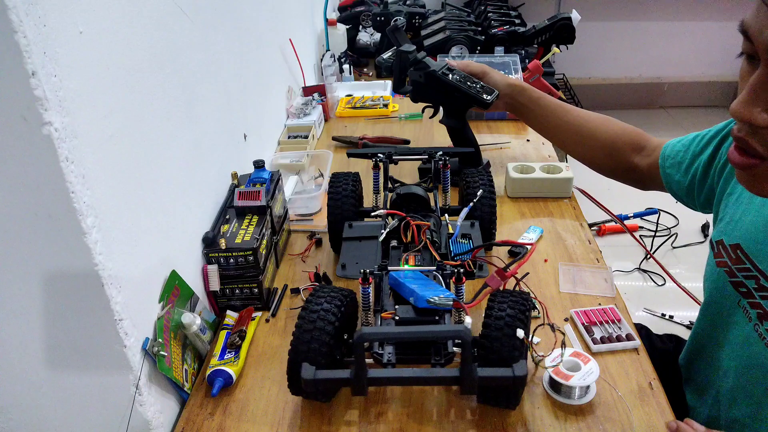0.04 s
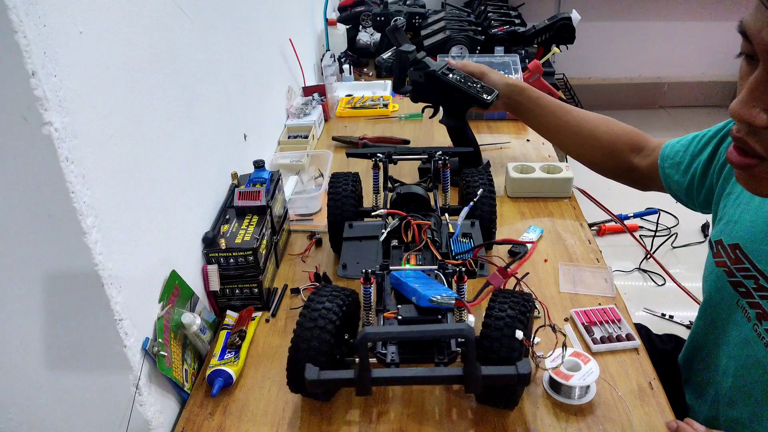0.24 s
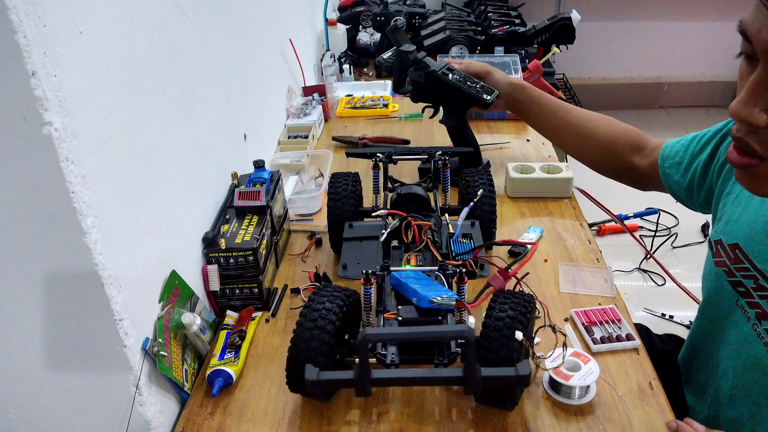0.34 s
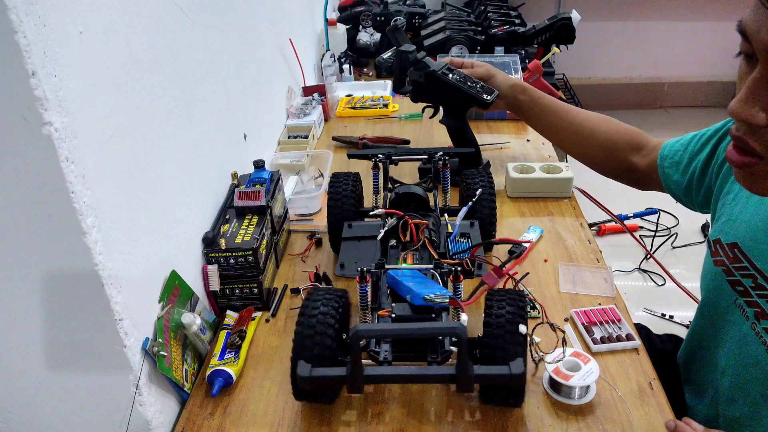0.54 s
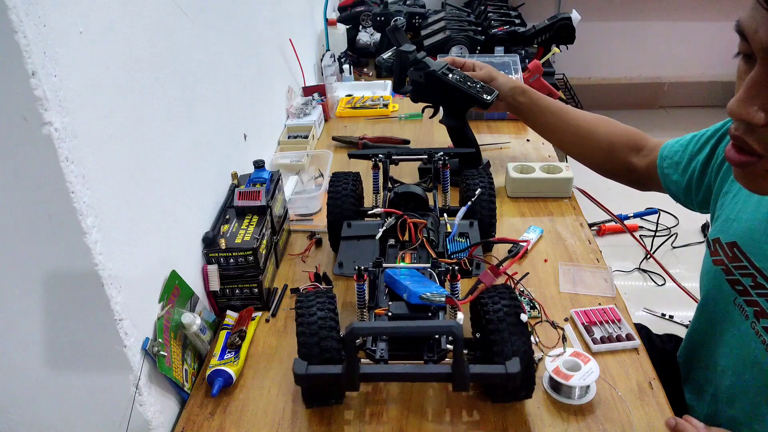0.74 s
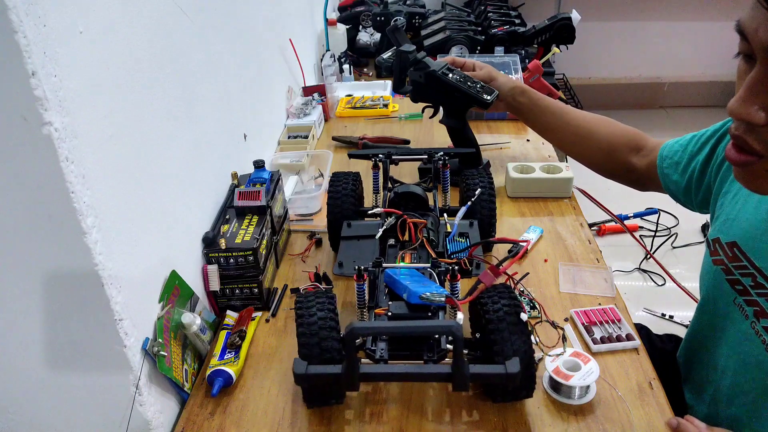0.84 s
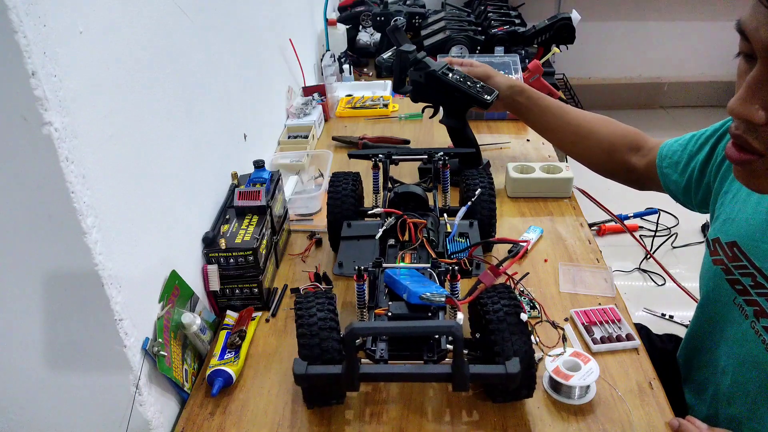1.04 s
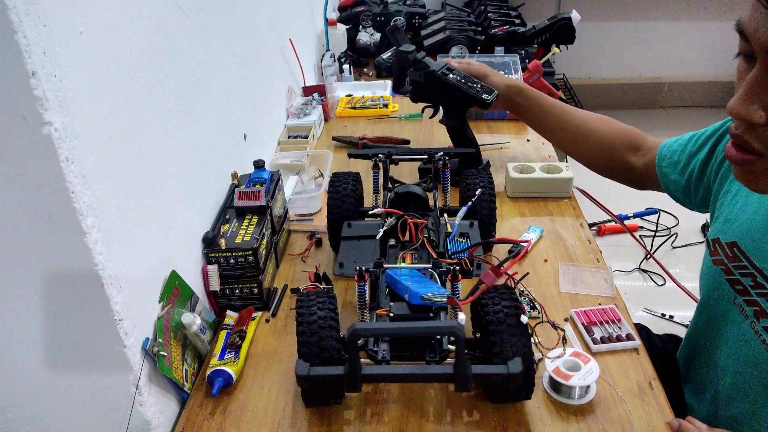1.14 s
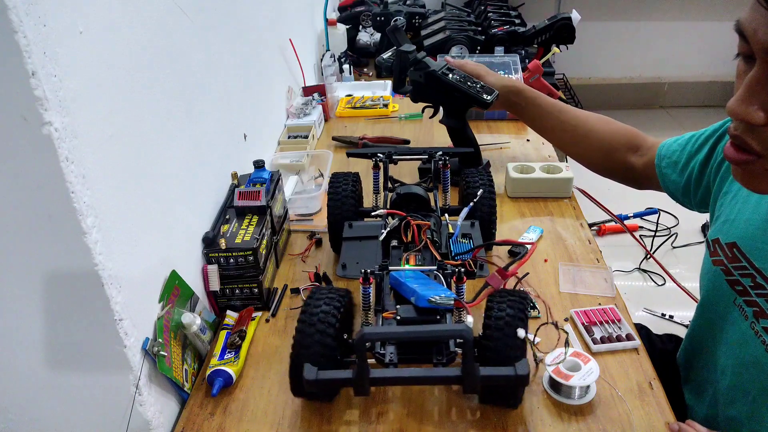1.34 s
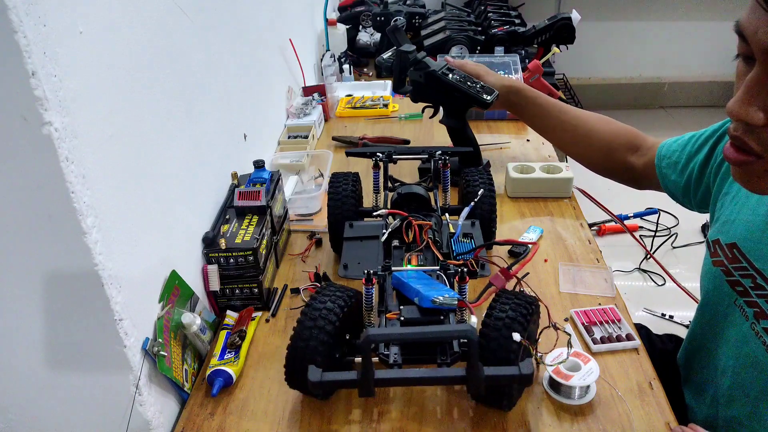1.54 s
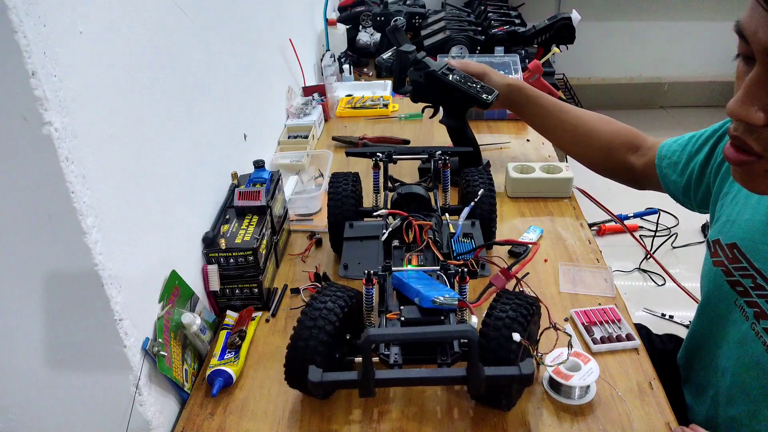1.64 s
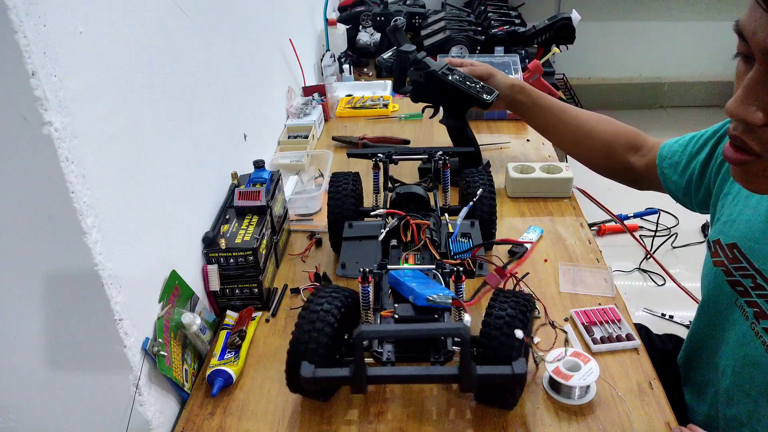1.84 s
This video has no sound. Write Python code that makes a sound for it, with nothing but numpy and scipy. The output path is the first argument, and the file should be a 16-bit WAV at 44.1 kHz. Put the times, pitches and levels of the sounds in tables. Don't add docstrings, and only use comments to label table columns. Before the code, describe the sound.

Small geared servo motor whines back and forth on a wooden bench, with one hard click

```python
import sys
import numpy as np
from scipy import signal
from scipy.fft import rfft, irfft
from scipy.io import wavfile
from scipy.ndimage import uniform_filter1d

SR = 44100
rng = np.random.default_rng(int(sys.argv[2]) if len(sys.argv) > 2 else 0)


def ratio_of_db(decibels):
    return 10 ** (np.asarray(decibels, float) / 20)


def transcribe(u):
    v = np.clip(np.atleast_2d(u).T, -1, 1)
    q = np.round(v * 32767).astype(np.int16)
    wavfile.write(sys.argv[1], SR, q)


N = 83790


def walk(rate):
    hold = int(SR / rate)
    steps = rng.standard_normal(size=600)
    stairs = np.repeat(steps[:N // hold + 1], hold)
    return 1.307 * uniform_filter1d(uniform_filter1d(stairs, hold), hold)[:N]


def unit(x):
    return x / np.sqrt(np.mean(x ** 2))


def ring(x, hz, width):
    return signal.lfilter(*signal.iirpeak(hz, hz / width, SR), x)


def air():
    # (frequency [Hz], level per Hz [dB])
    air_spectrum = [(22, 8.5), (55, -11), (200, -15), (500, -16.5), (1000, -14.5), (2500, -24),
                    (6000, -33.5), (14000, -29)]
    air_db, swell_db, flicker_db = -61.5, 1.5, 1.06
    hum_hz, hum_width_hz, hum_db = 124, 11, -71.5
    f = np.fft.rfftfreq(N, 1 / SR) + 1
    swell = walk(2.75)
    curve_hz, curve_db = np.array(air_spectrum).T
    shape = rfft(rng.standard_normal(N)) * ratio_of_db(np.interp(np.log(f), np.log(curve_hz), curve_db))
    bands = 0
    for k in range(21):
        share = np.clip(1 - np.abs(2 * np.log2(f / 18) - k), 0, 1)
        motion_db = swell_db * swell * (k < 8) + flicker_db * walk(8.976)
        bands = bands + irfft(shape * share, N) * ratio_of_db(motion_db)
    hum = ring(rng.standard_normal(N), hum_hz, hum_width_hz)
    return ratio_of_db(air_db) * unit(bands) + ratio_of_db(hum_db) * unit(hum)


def drive(t):
    # (time [s], tooth rate [Hz], rattle level [dB], whine over rattle [dB],
    # lift of even overtones [dB])
    stroke_short = [
        (.07, 1501, -60.5, -9, 1),
        (0.125, 1500, -48, -9, 1),
        (.145, 1479, -43, -3, -3),
        (.158, 1373, -45, -1.5, 0),
        (.172, 1122, -49.5, -5.5, 4.5),
        (0.189, 903, -60.5, -5, 3),
    ]
    stroke_first = [(.21, 1700, -63, -8, -1), (.246, 1696, -55.5, -6, -1), (.27, 1725, -51, 3, -5),
                    (.3, 1804, -43, 0, -3), (.33, 1744, -42, 3.5, -2), (.351, 1686, -41.5, 4, -0.5),
                    (.363, 1456, -41.5, 1.5, 1.5), (.378, 1128, -46.5, 2.5, 5), (.4, 798, -55, -14, 1)]
    stroke_back = [(.48, 1800, -59, -7, -3), (.518, 1856, -48, -3, -3), (.54, 1861, -43, -5, 5),
                   (.568, 1670, -42.5, -7, -4), (.6, 1360, -41.5, -0.5, 1.5), (.618, 1312, -42.5, 0, 0),
                   (.638, 1412, -40, 5, -5), (0.661, 1447, -42.5, 3.5, 2.5), (.68, 1368, -38.5, 6, -4.5)]
    stroke_back_end = [(.696, 1305, -42.5, 0, 4.54), (.73, 1277, -39, -0.5, 5.8),
                       (.752, 1216, -45, -4.5, 4.2), (.77, 1150, -41, -3, 7.5), (.8, 1038, -46, -1, 8.8),
                       (.812, 944, -43, -13, 2), (.85, 649, -49, -15, 0.92), (.875, 558.5, -65, -25, 1),
                       (.89, 501, -66, -20, 1)]
    stroke_to_stop = [(1.21, 1900, -62, -9, 5), (1.256, 1900, -50, -7, 1), (1.3, 1866, -45.5, 4.5, -6),
                      (1.36, 1732, -43, 4, -1), (1.44, 1638, -43.5, -1.5, 4), (1.525, 1561, -45, 2.5, 2),
                      (1.568, 1453, -38.5, 5.5, -1.5), (1.584, 1240, -42, 0.5, 0.5),
                      (1.607, 849.3, -45.5, -7, -12)]
    engage_times = [
        .145,
        .262,
        .53,
        1.295,
    ]
    # (loudest time [s], rattle level [dB], rise [s], fall [s])
    jogs = [(0.029, -49.5, 0.032, 0.039), (0.429, -45, 0.021, 0.019), (.9, -65, .02, 0.11),
            (.465, -51, 0.014, 0.012), (1.159, -54.5, .002, 0.0063), (1.174, -52, 0.0084, .008),
            (1.19, -55, .005, 0.0058), (1.649, -53.5, .03, .05), (1.778, -52, 0.015, 0.013),
            (1.822, -49.5, 0.0089, 0.026), (1.85, -60, 0.016, 0.019), (1.9, -52, 0.029, .02)]
    engage_rise_s, edge_s = 0.007, 0.0044
    hz, rattle, whine, even_db = np.full(N, 1e3), np.zeros(N), np.zeros(N), np.zeros(N)
    strokes = (stroke_short, stroke_first, stroke_back + stroke_back_end, stroke_to_stop)
    for rows, engage in zip(strokes, engage_times):
        s, rate_hz, db, over_db, lift_db = np.array(rows).T
        on = np.clip(np.minimum(t - s[0], s[-1] - t) / edge_s, 0, 1)
        hz = np.where(on > 0, np.interp(t, s, rate_hz), hz)
        even_db = np.where(on > 0, np.interp(t, s, lift_db), even_db)
        rattle = rattle + on * ratio_of_db(np.interp(t, s, db))
        loaded = (1 + np.tanh((t - engage) / engage_rise_s)) / 2
        whine = whine + on * loaded * ratio_of_db(np.interp(t, s, db + over_db))
    for s, db, rise, fall in jogs:
        rattle = rattle + ratio_of_db(db) * np.exp(-((t - s) / np.where(t < s, rise, fall)) ** 2)
    return hz, rattle, whine, even_db


def gear_mesh(hz, even_db):
    # (multiple of tooth rate [ratio], level [dB])
    teeth = [(1, -4), (2, -4), (3, 0), (4, -3), (5, -8), (6, -7.5), (7, -3.5), (8, -6), (9, -14)]
    second_gear = (2.1, -26)
    jitter, wobble_rate_hz = 0.0029, 35
    wobble_db, wobble_growth_db = 1.14, 0.0506
    first_db_per_octave, first_full_hz = 13, 1780
    top_tooth_hz = 12000
    phase = 2 * np.pi * np.cumsum(hz * (1 + jitter * walk(150))) / SR
    mesh = 0
    for k, db in teeth + [second_gear]:
        tone_db = db + even_db * (k % 2 == 0)
        tone_db = tone_db + (k == 1) * first_db_per_octave * np.log2(hz / first_full_hz)
        tone_db = tone_db + (wobble_db + wobble_growth_db * k * k) * walk(wobble_rate_hz)
        tone = np.sin(k * phase + 6 * rng.random())
        mesh = mesh + ratio_of_db(tone_db) * tone / (1 + (k * hz / top_tooth_hz) ** 10)
    return mesh


def loose_rattle():
    grit_db = 2 * rng.exponential(size=N)
    flutter_db = 0.24 * walk(100)
    return unit(rng.standard_normal(N) * ratio_of_db(grit_db + flutter_db))


def servo(t):
    # (frequency [Hz], width [Hz], level [dB])
    case_modes = [(1150, 380, -21), (1800, 187, -6.5), (2286, 192, -4), (2653, 246, -1.5), (3330, 710, -9),
                  (4167, 320, 1.5), (4656, 525, -2), (5190, 675, -7), (6190, 570, -9), (7140, 296, -2.5),
                  (7715, 420, -1.5), (8610, 720, -6), (9346, 590, -7), (11160, 1540, -15.5)]
    whine_db, leak_db, leak_hz, leak_width_hz = -4.5, -18.5, 436, 625
    hz, rattle, whine, even_db = drive(t)
    push = rattle * loose_rattle() + ratio_of_db(whine_db) * whine * gear_mesh(hz, even_db)
    case = 0
    for k, (f, width_hz, db) in enumerate(case_modes):
        case = case + (-1) ** k * ratio_of_db(db) * ring(push, f, width_hz)
    leak = ratio_of_db(leak_db) * ring(push, leak_hz, leak_width_hz)
    return ratio_of_db(12.5) * (case + leak)


def scrub(t):
    scrub_db, top_hz, smooth_s = -12, 140, 0.053
    rattle = drive(t)[1]
    effort = np.sqrt(uniform_filter1d(rattle, int(smooth_s * SR)) * ratio_of_db(-45) + 1e-18)
    bench = ring(rng.standard_normal(N), 40, 106)
    rumble = signal.lfilter(*signal.butter(1, top_hz, fs=SR), bench)
    return ratio_of_db(scrub_db) * effort * unit(rumble)


def room(x, t):
    near_db, near_t60_s = -7, 0.04
    tail_db, tail_t60_s, tail_top_hz, tail_rise_s = -19.5, 0.75, 9100, 0.048
    sparse = (t > .001) * (rng.random(N) < .03)
    near = rng.standard_normal(N) * 1000 ** (-t / near_t60_s) * sparse
    tail = rng.standard_normal(N) * 1000 ** (-t / tail_t60_s) * np.minimum(t / tail_rise_s, 1)
    tail = signal.lfilter(*signal.butter(1, tail_top_hz, fs=SR), tail)
    echo = ratio_of_db(near_db) * near / np.linalg.norm(near)
    echo = echo + ratio_of_db(tail_db) * tail / np.linalg.norm(tail)
    return x + signal.fftconvolve(x, echo)[:N]


def knocks(t):
    # (time [s], level [dB], softness [s])
    hits = [
        (1.6094, -31, .00005),
        (1.629, -48.5, .0001),
        (1.158, -56.5, 0.000076),
        (1.823, -57, 0.000068),
    ]
    # (frequency [Hz], level [dB], t60 [s])
    stop_modes = [(228.2, -13.5, 0.025), (386.8, -3, 0.022), (631, 0, 0.022), (891, -2.5, .017),
                  (1258, 4.5, 0.013), (1800, -1.5, .013), (2374, 1.5, 0.014), (3095, -2.5, 0.011),
                  (4430, 2.5, 0.011), (7500, 4, 0.019)]
    rise_cycles = 1.065
    push = 0
    for s, db, soft in hits:
        push = push + ratio_of_db(db) * np.exp(-((t - s) / soft) ** 2) / (soft * SR)
    u = t[t < .09]
    body = 0
    for k, (f, db, t60) in enumerate(stop_modes):
        envelope = 1000 ** (-u / t60) * (1 - np.exp(-u * f / rise_cycles))
        body = body + (-1) ** k * ratio_of_db(db) * np.sin(2 * np.pi * f * u) * envelope
    return signal.fftconvolve(push, body)[:N]


def scene():
    t = np.arange(N) / SR
    background = air()
    moves = servo(t) + knocks(t)
    mono = room(moves, t) + scrub(t) + background
    return np.array([mono, mono])


def low_pass(x):
    return signal.sosfilt(signal.butter(12, 14610, fs=SR, output="sos"), x)


def record(dry):
    patch_from_hz, patch_share, patch_db = 5200, .4, -1
    patch_bins, patch_frames, window = 32, 3, 1024
    top_hz = 14350
    f, frames, z = signal.stft(dry[0], SR, nperseg=window)
    bin_patch, frame_patch = np.arange(len(f)) // patch_bins, np.arange(len(frames)) // patch_frames
    chance = rng.random(z.shape)[np.ix_(bin_patch, frame_patch)]
    above_hz = f[:, None] - patch_from_hz
    patch = chance < patch_share * np.clip(above_hz / 3000 + .3, 0, 1) * (above_hz > 0)
    size = np.sqrt(np.maximum(uniform_filter1d(np.abs(z) ** 2, size=16, axis=0), 0))
    noise = ratio_of_db(patch_db + 3) * size * np.exp(2j * np.pi * rng.random((2,) + z.shape))
    both = signal.istft(np.where(patch, noise, z), SR, nperseg=window)[1][:, :N]
    both = signal.sosfilt(signal.ellip(8, .2, 80, top_hz, fs=SR, output="sos"), both)
    return low_pass(both)


dry = scene()
out = record(dry)
transcribe(out)
```